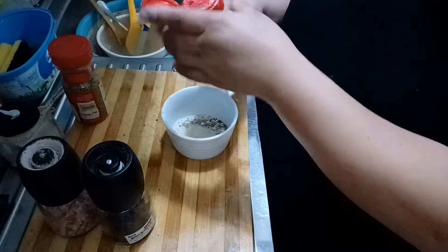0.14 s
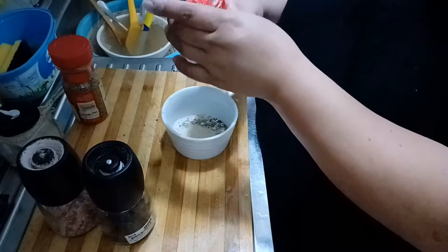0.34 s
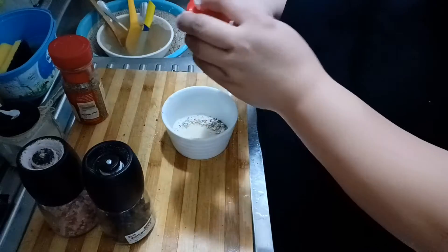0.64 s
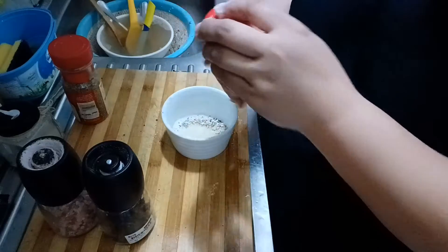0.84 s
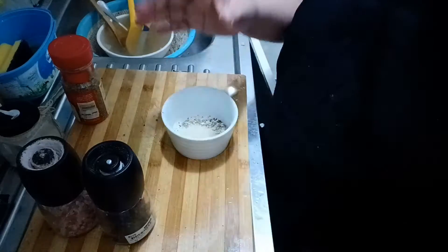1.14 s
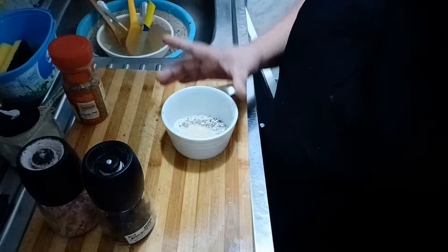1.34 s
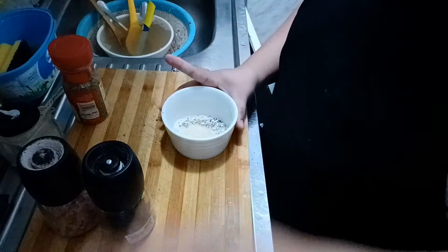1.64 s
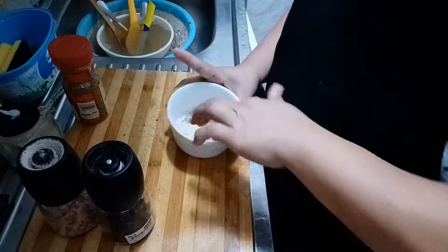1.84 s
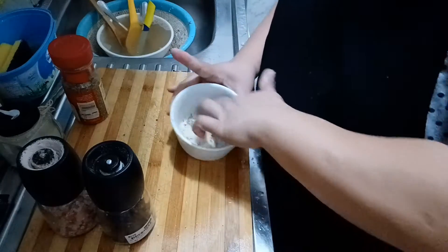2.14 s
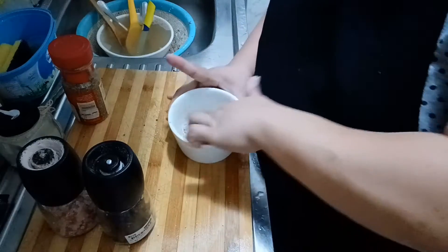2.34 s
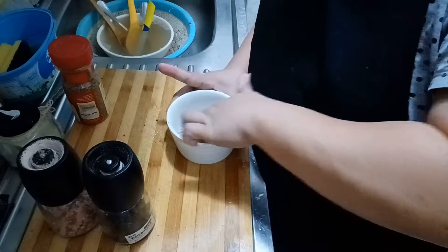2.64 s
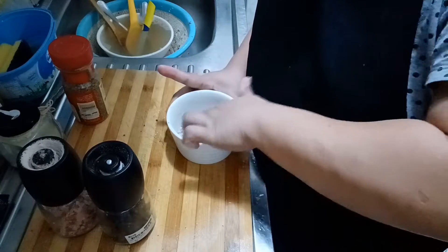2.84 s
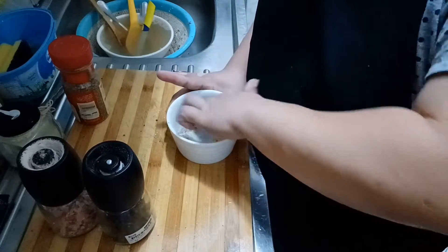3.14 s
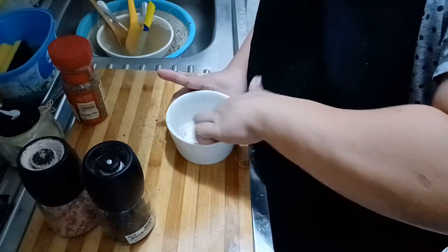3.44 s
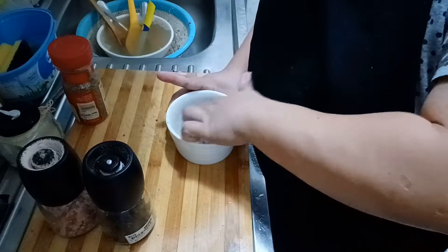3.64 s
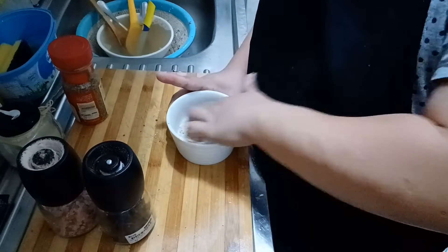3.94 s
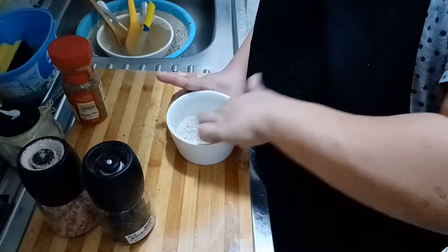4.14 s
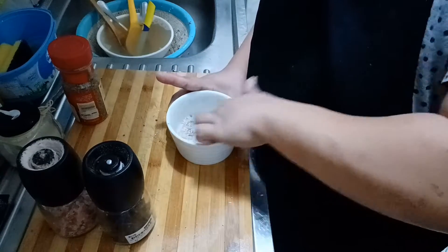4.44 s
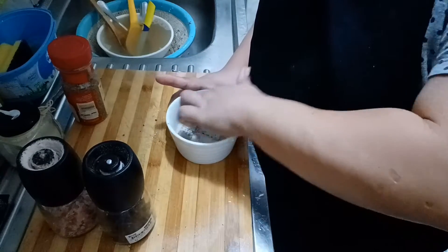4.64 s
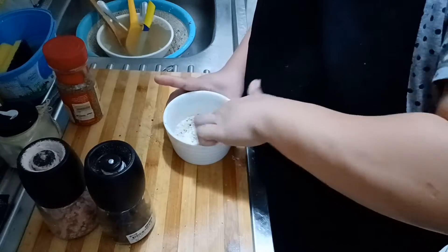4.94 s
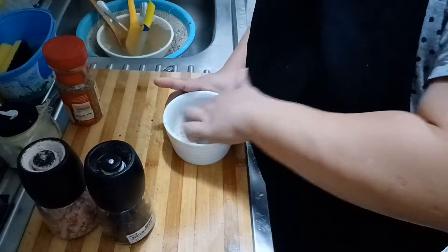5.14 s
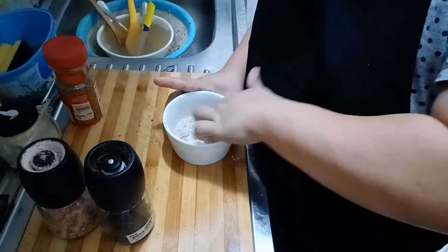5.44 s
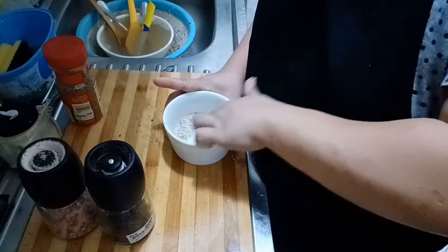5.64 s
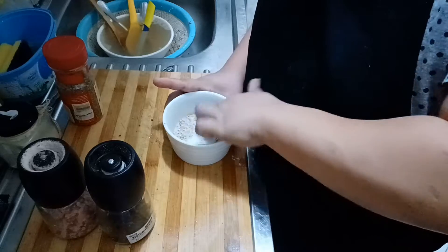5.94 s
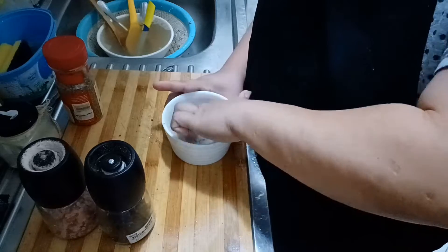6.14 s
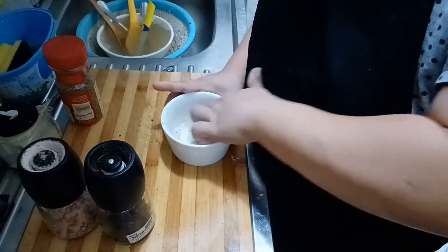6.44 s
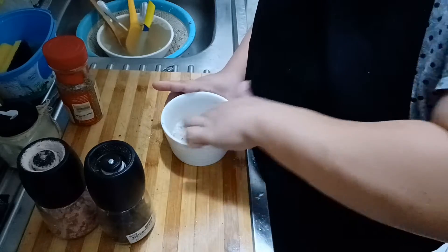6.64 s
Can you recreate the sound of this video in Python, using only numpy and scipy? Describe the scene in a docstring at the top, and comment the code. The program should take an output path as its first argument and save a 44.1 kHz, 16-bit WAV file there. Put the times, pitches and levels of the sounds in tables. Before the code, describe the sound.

A spice jar's cap snaps shut, then fingers stir dry spices in a ceramic bowl that knocks on wood, over a low hum.

```python
"""A small ceramic bowl knocks, rocks and skids on a wooden board as fingers stir dry spices in it.
The powder rubs and hisses under each stroke, coarse grains crack, and skin squeaks on glaze and plastic.
Before the stirring, spice trickles from a jar and its plastic cap is knocked and snapped shut.
It all plays close up on a worktop in a small, hard-walled kitchen, over the hum of an appliance."""
import sys
import numpy as np
from scipy import signal
from scipy.fft import rfft, irfft, next_fast_len
from scipy.io import wavfile
from scipy.ndimage import uniform_filter1d, map_coordinates

SR = 44100
rng = np.random.default_rng(int(sys.argv[2]) if len(sys.argv) > 2 else 0)


def persist_wave(psi):
    """Save psi, clipped to +-1, as 16-bit WAV."""
    counts = np.round(np.clip(psi, -1, 1) * 32767).astype(np.int16)
    wavfile.write(sys.argv[1], SR, np.atleast_2d(counts).T)


N = 298998
TIME = np.arange(N) / SR
HIT_N = int(0.6 * SR)  # one contact and its tail
HIT_TIME = np.arange(HIT_N) / SR

# coarse grains against the ceramic: freq_hz, gain_db
GRIT_EQ = [(100, -45), (300, 1.5), (1000, -2.5), (2200, -2.5), (2800, -2.5), (3800, -2.5), (5200, 1.5),
           (8300, -13.5), (10800, -4), (13000, 1), (16000, -4)]


def bowl_knocks(landing_s=0.018, rock_s=0.0115, rock_loss_db=6.5, seat_hz=359):
    """The bowl tips with a clack, rings and thuds the board, then drops back and rocks to rest."""
    # the bowl hits the board, each time with a short pitched tone:
    # start_s, clack_db, hardness_hz, ring_db, tone_hz, tone_db, thud_db, settle_db
    hits = [(1.665, -43, 4900, -41.5, 215, -25.5, -16.5, -46.5),
            (1.8655, -58.5, 1170, -83, 1230, -41, -25, -59.5), (2.398, -59, 1500, -53, 265, -36, -57, -58),
            (2.6410, -39, 3980, -51, 630, -16, -28.5, -41.5), (2.760, -51, 800, -69, 629, -23.5, -39, -46),
            (3.7771, -47.5, 1500, -53, 341.3, -20, -54, -42.5),
            (4.1436, -45.5, 4000, -37, 1874, -15, -41, -46.5), (4.263, -45, 400, -62, 359, -18, -42.5, -48),
            (4.9770, -33, 700, -30, 606, -14.5, -45, -37),
            (5.002, -32.5, 2500, -43.5, 330, -32.5, -15.5, -33.5),
            (5.1294, -49.5, 1800, -63, 246, -45, -47, -49.5), (6.4400, -63, 900, -75, 267, -40, -26.5, -56)]
    # ceramic on wood: freq_hz, gain_db
    clack_eq = [(60, -26), (160, -36), (230, 11.5), (450, 1.5), (720, 0), (1000, -6), (1800, -7),
                (2300, -13.5), (3200, -8.5), (5000, -13), (8500, -14.5), (15000, -19.5)]
    # the ceramic's ring: pitch_hz, level_db, t60_s
    bowl_modes = [(1170, -2.5, 0.084), (1330, -1, 0.04), (3070, -6.5, 0.07), (3300, -15, 0.08)]
    # the board's thud: pitch_hz, level_db, t60_s
    board_modes = [(107, 0, 0.19), (133, -5.5, 0.11)]
    out = np.zeros((2, N))
    for start, clack_db, hard_hz, ring_db, tone_hz, tone_db, thud_db, settle_db in hits:
        clack = unit_hit(colour(burst(0.013, rough=0.66), clack_eq, hard_hz))
        add(out, start, amp(clack_db) * kitchen(clack, near_db=7, far_db=-2, near_t60=0.068))
        ceramic = ring(bowl_modes, attack_s=0.00059)
        add(out, start, amp(ring_db) * kitchen(ceramic, near_db=5.5, far_db=-10.5))
        add(out, start - 0.002, amp(tone_db) * contact_tone(tone_hz))
        add(out, start + 0.0044, amp(thud_db) * ring(board_modes, attack_s=0.011))
        landing = start + landing_s
        add(out, landing, amp(settle_db + 11) * contact_tone(seat_hz))
        for k in range(3):
            touch = unit_hit(colour(burst(0.024, rough=0.77), clack_eq, hard_hz=700))
            gain = amp(settle_db - k * rock_loss_db)
            add(out, landing + k * rock_s, gain * kitchen(touch, near_db=-1, far_db=-6.5))
    return out


def contact_tone(hz):
    """The short tone of each contact: mostly low and hollow, once a high squeak as the foot skids."""
    modes = [(hz, 0, 24 / hz + 0.018), (hz * 1.16, -6, 0.035), (hz * 0.86, -9, 0.035)]
    return kitchen(ring(modes, attack_s=0.0038), near_db=-15, far_db=-17)


def bowl_skids(slips_per_s=700):
    """The foot sticks and slips in a quick, uneven train; under weight it also drives the board."""
    # judders over the wood: start_s, level_db, length_s, hardness_hz, board_offset_db
    skids = [(4.148, -33, 0.025, 3520, -8.5), (4.9751, -28, 0.042, 1114, 1.5),
             (5.025, -34.5, 0.022, 3530, -6), (5.13, -43, 0.0067, 2980, -2), (5.161, -48, 0.014, 2500, 2),
             (5.453, -62.5, 0.15, 700, 3.5)]
    # the scraping foot, then the board under it: freq_hz, gain_db
    foot_eq = [(200, -16), (950, -2), (1550, -3), (1880, 1), (2600, -5), (8500, -15.5), (15000, -16)]
    board_eq = [(60, -6), (250, -10.5), (600, -1), (1300, -12.5), (2500, -20), (8000, -55.5)]
    out = np.zeros((2, N))
    for start, db, length, hard_hz, board_db in skids:
        travel = np.cumsum(rng.exponential(size=HIT_N) ** 2) * slips_per_s / (2 * SR)
        slips = np.diff(np.floor(travel), prepend=0)
        friction = slips * rng.normal(size=HIT_N) + 0.11 * rng.normal(size=HIT_N)
        force = friction * np.exp(-(HIT_TIME / length) ** 4)
        foot = unit_hit(colour(force, foot_eq, hard_hz))
        board = amp(board_db) * unit_hit(colour(force, board_eq))
        add(out, start, amp(db) * kitchen(foot + board, near_db=-0.5, far_db=-4))
    return out


def board_bumps():
    """Soft pushes of the hand rumble through the board."""
    # the hand leans in: start_s, level_db, decay_s
    pushes = [(3.819, -38, 0.006), (4.189, -25.5, 0.16), (4.279, -41.5, 0.033), (4.989, -17.5, 0.0099),
              (5.037, -27.5, 0.11)]
    # the board's low end: freq_hz, gain_db
    rumble_eq = [(42, -18), (66, 11.5), (138, 10), (200, -21), (400, -7), (2000, -69)]
    out = np.zeros((2, N))
    for start, db, decay in pushes:
        push = rng.standard_normal(HIT_N) * np.exp(-(HIT_TIME / decay) ** 2)
        add(out, start, amp(db) * unit_hit(colour(push, rumble_eq)))
    return out


def stirring(start_s=1.8):
    """Fingertips rub the spices round the bowl and keep moving a little between strokes."""
    # finger strokes: start_s, length_s, rub_db, hiss_db
    moves = [(1.986, 0.28, -61, -77), (2.349, 0.05, -51.5, -68.5), (2.41, 0.13, -68, -70.5),
             (2.591, 0.024, -56.5, -66), (2.69, 0.17, -64.5, -69), (2.915, .05, -74, -68.5),
             (3.016, 0.074, -71.5, -66), (3.16, 0.069, -79, -75), (3.318, 0.11, -68.5, -63.5),
             (3.406, 0.12, -59.5, -69), (3.615, 0.08, -62, -75), (3.766, 0.061, -58.5, -63.5),
             (3.876, 0.12, -66.5, -69), (4.133, 0.049, -47.5, -51), (4.212, 0.069, -52.5, -64),
             (4.449, 0.047, -62, -62), (4.519, 0.032, -56, -59.5), (4.683, 0.055, -69.5, -81),
             (4.761, 0.0197, -69.5, -65.5), (4.908, 0.087, -52.5, -71.5), (5.28, 0.12, -65, -69),
             (5.411, 0.083, -56.5, -67), (5.57, 0.036, -65, -74), (5.646, 0.15, -67, -69.5),
             (5.934, 0.11, -71, -69.5), (6.301, 0.038, -59.5, -77), (6.356, 0.047, -56, -65),
             (6.508, 0.087, -62.5, -70.5), (6.64, 0.19, -62.5, -68)]
    # the dull rub of the fingertips: freq_hz, gain_db
    rub_eq = [(300, 7), (800, 6), (1300, -4.5), (2200, -12), (6000, -16), (8000, -22.5), (16000, -52)]
    # the bowl's hollow, excited by grains dragged along its wall: freq_hz, gain_db
    scratch_eq = [(900, -32.5), (1700, -2.5), (2200, 5), (2700, -3), (4500, -5.5), (9000, -26)]
    # the hiss of fine powder: freq_hz, gain_db
    powder_eq = [(1500, -3.5), (4500, -9), (6000, 5.5), (8300, -3.5), (11000, 2), (14000, -4.5),
                 (16000, -4.5)]
    pressure = strokes([(start, length, db) for start, length, db, _ in moves], rest_db=-76)
    flow = strokes([(start, length, db) for start, length, _, db in moves], rest_db=-88)
    catch = wobble(45)  # the fingertips catch and let go
    rub = amp(5 + 0.78 * catch) * grains(rub_eq, per_s=700, smear=1, width=0.84, patchy_db=2.5)
    scratch = amp(-1.5 + 0.5 * wobble(10)) * grains(scratch_eq, per_s=670, smear=1, patchy_db=3)
    hiss = amp(5 + 1.8 * catch) * grains(powder_eq, per_s=1700, smear=1.3, patchy_db=1.3)
    grit = amp(2 * catch) * grains(GRIT_EQ, per_s=130, smear=0.5)
    return stroke(start_s, N / SR) * (pressure * (rub + scratch) + flow * (hiss + grit))


def grain_cracks():
    """Coarse grains burst under pressure against the ceramic."""
    # single cracks: start_s, level_db, t60_s, hardness_hz
    cracks = [(1.665, -56, 0.0063, 9000), (2.6424, -50, 0.011, 9000), (3.423, -54.5, 0.0053, 3500),
              (4.1437, -44, 0.0021, 14000), (5.002, -31, 0.017, 10000), (5.0192, -23.5, 0.006, 30700),
              (5.044, -34, 0.009, 3000), (5.0593, -31, 0.031, 22000), (5.0810, -34.5, 0.051, 8930),
              (5.029, -37.5, .008, 13950), (6.3173, -57, 0.0029, 11000)]
    out = np.zeros((2, N))
    for start, db, t60, hard_hz in cracks:
        crush = rng.standard_normal(HIT_N) * fade(t60)
        crack = unit_hit(colour(crush, GRIT_EQ, hard_hz))
        add(out, start, amp(db) * kitchen(crack, near_db=2.5, far_db=-8.5, near_t60=0.075))
    return out


def jar_cap():
    """Each push on the cap sounds the hollow jar, the sharp catch and the short clink of the flap."""
    # pushes on the cap: start_s, level_db, body_offset_db, snap_offset_db, flap_db
    pushes = [(0.6699, -20.5, -0.5, -13, -61), (0.6816, -29, -1, -14, -62.5),
              (0.9068, -35.5, 3.5, 6, -39.5), (0.912, -40, -17, 1.5, -47), (1.105, -61.5, -7, -2, -49)]
    # the jar's hollow body: freq_hz, gain_db
    body_eq = [(175, -32), (225, -12), (280, -8), (370, -2.5), (480, -5), (570, -16), (900, -15.5),
               (1500, -14), (2200, -22), (4500, -38), (7040, -29.5), (8500, -43), (16000, -46)]
    # the cap's catch: freq_hz, gain_db
    snap_eq = [(240, -38), (450, -4.5), (600, -1.5), (710, 4), (850, -6), (2000, -5), (2450, 2), (3300, -6),
               (4400, -5.5), (9500, -11), (13000, -8), (16000, -11)]
    # the jar's ring: pitch_hz, level_db, t60_s
    jar_modes = [(224, -5.5, 0.25), (349, -3.5, 0.19), (412.4, -1.5, 0.12), (487, -8.5, 0.073),
                 (699, -17.5, 0.079), (1023, -12.5, 0.14), (1350, -14.5, 0.077)]
    # the flap's clink: pitch_hz, level_db, t60_s
    flap_modes = [(2430, -7, 0.05), (2780, 1.5, 0.037)]
    out = np.zeros((2, N))
    for start, db, body_db, snap_db, flap_db in pushes:
        body = unit_hit(colour(burst(0.006, rough=0.25), body_eq))
        snap = unit_hit(colour(burst(0.0091, rough=0.5), snap_eq))
        flap = ring(flap_modes, attack_s=0.0007)
        add(out, start, amp(db + body_db) * kitchen(body, near_db=2.5, far_db=-9.5, near_t60=0.076))
        add(out, start, amp(db + snap_db) * kitchen(snap, near_db=5.5, far_db=-3, near_t60=0.06))
        add(out, start, amp(db + body_db + 3) * ring(jar_modes, attack_s=0.0011))
        add(out, start, amp(flap_db) * kitchen(flap, near_db=-8, far_db=-7.5))
    return out


def spice_pour(peak_s=0.18, width_s=0.06):
    """The jar is tipped once: a fine trickle swells and ebbs."""
    # falling powder: freq_hz, gain_db
    trickle_eq = [(2500, -7.5), (7000, -1), (8500, -4), (12000, 3), (16000, -1.5)]
    tipping = np.exp(-((TIME - peak_s) / width_s) ** 2 / 2)
    return amp(-60.5) * tipping * grains(trickle_eq, per_s=5000, smear=1.2, width=0.88, patchy_db=1)


def finger_squeaks(jitter_hz=135):
    """Skin sticks and slips so fast that it sings one thin, unsteady note."""
    # fingers shift on plastic and glaze: start_s, length_s, pitch_hz, level_db
    squeaks = [(0.353, 0.33, 3100, -77.5), (1.368, 0.1, 3100, -73), (1.402, 0.045, 6100, -79),
               (1.477, 0.053, 2820, -76), (1.701, 0.034, 3260, -57.5), (2.93, 0.21, 6040, -75),
               (3.159, 0.077, 6070, -74), (4.781, 0.023, 6020, -65), (6.22, 0.029, 4900, -79),
               (6.662, 0.023, 6080, -65.5)]
    out = np.zeros((2, N))
    for start, length, hz, db in squeaks:
        waver = unit(uniform_filter1d(rng.standard_normal(HIT_N), size=60))
        note = np.sin(2 * np.pi * np.cumsum(hz + jitter_hz * waver) / SR)
        swell = np.sin(np.pi * np.minimum(HIT_TIME / length, 1))
        add(out, start, amp(db) * kitchen(note * swell, near_db=8, far_db=-4))
    return out


def jar_handling():
    """Skin rustles on the plastic jar."""
    # shifts of grip: start_s, length_s, level_db
    grips = [(.475, 0.081, -67.5), (1.47, 0.055, -69)]
    # skin on plastic: freq_hz, gain_db
    rustle_eq = [(400, -6.5), (1500, -1.5), (3200, -1.5), (6000, -7), (12000, -22.5)]
    rustle = grains(rustle_eq, per_s=1400, smear=1.6)
    return strokes(grips, rest_db=-79) * amp(1.1 * wobble(43)) * rustle


def appliance(hum_hz=100):
    """A motor hums at twice the mains rate over a low drone and moving air."""
    # the low drone: freq_hz, gain_db
    drone_eq = [(42, -14.5), (50, -12), (70, -9.5), (90, -2), (122, 3), (140, -6.5), (170, -39),
                (1000, -91.5)]
    # the rush of air: freq_hz, gain_db
    air_eq = [(100, -36.5), (170, -5), (270, 3.5), (385, -8), (770, -10.5), (950, -20.5), (2090, -34.5),
              (4830, -51.5), (7060, -35), (16000, -47.5)]
    # the rush grows a little: time_s, level_db
    air_levels = [(1.3, -62), (2.1, -58.5), (5.8, -57.5)]
    hum = np.sqrt(2) * amp(-45.5 + wobble(23)) * np.sin(2 * np.pi * hum_hz * TIME)
    drone = amp(-51) * spread(colour(rng.standard_normal((2, N)), drone_eq), width=0.18)
    air_gain = amp(np.interp(TIME, *np.transpose(air_levels)))
    air = air_gain * spread(colour(rng.standard_normal((2, N)), air_eq), width=0.39)
    return hum + drone + air


def kitchen(x, near_db, far_db, near_t60=0.14):
    """Direct sound, quick echoes from worktop and sink, and the walls' longer answer."""
    # the walls' decay: freq_hz, t60_s
    wall_decay = [(150, .3), (500, .33), (2500, .32), (7000, .3), (15000, .25)]
    hz, t, bands = signal.stft(rng.standard_normal((2, HIT_N)), SR, nperseg=256)
    decay = np.exp(-np.log(1000) * t / along(wall_decay, hz)[:, None])
    far = signal.istft(bands * decay, SR, nperseg=256)[1][:, :HIT_N]
    far = spread(far * rise(0.013), width=0.72)
    near = spread(rng.standard_normal((2, HIT_N)) * fade(near_t60) * rise(0.00013), width=1)
    response = (amp(near_db) * near + amp(far_db) * far) / np.sqrt(HIT_N)
    response[0, 0] += 1  # the direct sound reaches the left first
    response[1, 4] += 1
    return signal.fftconvolve(x[None], response, axes=1)[:, :HIT_N]


def grains(eq, per_s, smear, width=1, patchy_db=3.5):
    """Tiny contacts in a smear of noise, shifting in colour, with a short echo as of bowl and hand."""
    ticks = (rng.random((2, N)) < per_s / SR) * rng.standard_normal((2, N))
    bands = signal.stft(unit(ticks) + smear * rng.standard_normal((2, N)), nperseg=512)[2]
    patches = uniform_filter1d(rng.standard_normal(bands.shape[1:]), size=4, axis=0)
    patches = uniform_filter1d(patches, size=14, axis=1)
    pair = signal.istft(bands * amp(patchy_db * unit(patches)), nperseg=512)[1][:, :N]
    cavity = burst(t60=0.03, rough=amp(-7))
    echoed = signal.fftconvolve(pair, cavity[None], axes=1)[:, :N]
    return spread(colour(echoed, eq), width)


def stroke(start, length, press_s=0.03, lift_s=0.048):
    """The envelope of a finger movement: ease in, hold, lift."""
    press = 0.5 + 0.5 * np.tanh((TIME - start) / press_s - 0.5)
    return press * np.exp(-np.maximum(TIME - start - length, 0) / lift_s)


def strokes(moves, rest_db):
    """The joint gain of finger movements over a resting level."""
    power = sum((amp(db) * stroke(start, length)) ** 2 for start, length, db in moves)
    return np.sqrt(amp(rest_db) ** 2 + power)


def burst(t60, rough):
    """The force of a contact: one sharp push and a brief rough crush."""
    crush = rng.standard_normal(HIT_N) * fade(t60)
    return (HIT_TIME == 0) + rough * crush / np.linalg.norm(crush)


def ring(modes, attack_s):
    """Damped modes that swell in briefly."""
    tones = sum(amp(db) * np.sin(2 * np.pi * hz * HIT_TIME) * fade(t60) for hz, db, t60 in modes)
    return tones * rise(attack_s)


def colour(x, eq, hard_hz=np.inf):
    """Causal EQ; a soft contact rolls off above hard_hz."""
    n = x.shape[-1]
    size = 2 * next_fast_len(n // 2 + 4096)
    hz = np.fft.rfftfreq(size, 1 / SR)
    cepstrum = irfft(np.log(amp(along(eq, hz)) / np.hypot(1, hz / hard_hz)))
    cepstrum[1:size // 2] *= 2  # minimum phase: nothing rings ahead of the hit
    cepstrum[size // 2 + 1:] = 0
    return irfft(rfft(x, size) * np.exp(rfft(cepstrum, size)))[..., :n]


def rise(attack_s):
    """An exponential attack."""
    return 1 - np.exp(-HIT_TIME / attack_s)


def fade(t60):
    """A decay of 60 dB in t60 seconds."""
    return np.exp(-np.log(1000) * HIT_TIME / t60)


def wobble(per_s):
    """A smooth random curve with per_s knots a second."""
    return map_coordinates(rng.standard_normal(int(N * per_s / SR) + 4), [TIME * per_s])


def along(points, hz):
    """Read (freq_hz, value) points on a log frequency axis."""
    freqs, values = np.transpose(points)
    return np.interp(np.log(hz + 1), np.log(freqs), values)


def spread(pair, width):
    """Two unrelated signals as a stereo pair; width is side over mid."""
    mid, side = pair
    return unit(np.array([mid + width * side, mid - width * side]))


def amp(db):
    """Decibels to gain."""
    return 10 ** (np.asarray(db) / 20)


def unit(x):
    """x at rms 1."""
    return x / np.sqrt(np.mean(x ** 2) + 1e-20)


def unit_hit(x):
    """x with the energy of 20 ms at rms 1."""
    return x / np.sqrt(np.sum(x ** 2) / (0.02 * SR))


def add(track, start_s, x):
    """Mix x into the track at start_s."""
    part = track[:, max(round(start_s * SR), 0):][:, :x.shape[-1]]
    part += x[..., :part.shape[1]]


def scene():
    """Everything in the kitchen, a little brighter on the left."""
    # the right side against the left: freq_hz, gain_db
    right_eq = [(100, -1.2), (500, 1), (1200, 1.07), (7000, -1), (12000, -2)]
    contacts = jar_cap() + bowl_knocks() + board_bumps() + bowl_skids() + grain_cracks()
    textures = finger_squeaks() + jar_handling() + stirring() + spice_pour()
    left, right = amp(0.5) * (contacts + textures + appliance())
    return np.array([left, colour(right, right_eq)])


def record(dry, low_hz=45, ceiling=0.62, top_hz=16150, edge_hz=300):
    """Shed the deepest bass, round off the highest peaks and cut the very top of the treble."""
    lean = signal.sosfilt(signal.butter(4, low_hz, "high", fs=SR, output="sos"), dry)
    rounded = lean / (1 + (lean / ceiling) ** 4) ** 0.25
    size = next_fast_len(N + SR // 2)
    high_cut = np.interp(np.fft.rfftfreq(size, 1 / SR), [top_hz - edge_hz, top_hz + edge_hz], [1, 0])
    return irfft(rfft(rounded, size) * high_cut, size)[:, :N]


dry = scene()
out = record(dry)
persist_wave(out)
```